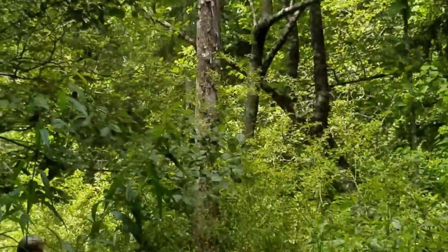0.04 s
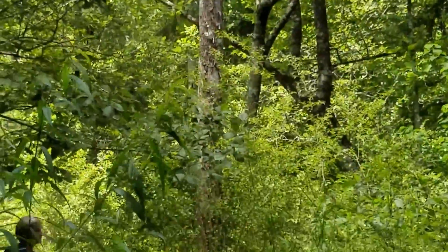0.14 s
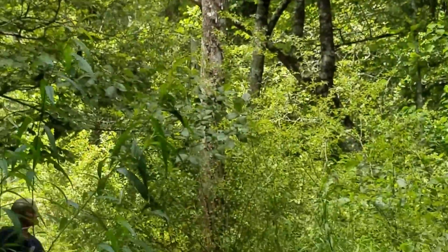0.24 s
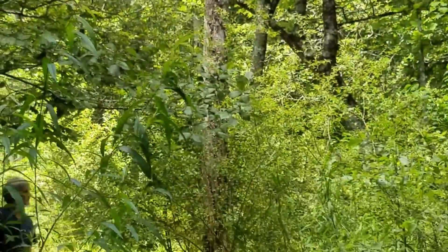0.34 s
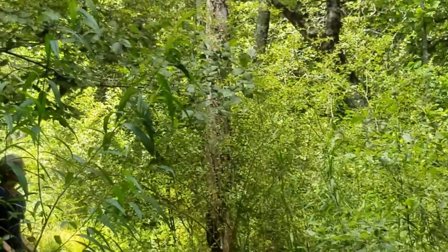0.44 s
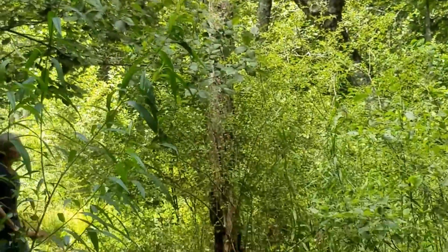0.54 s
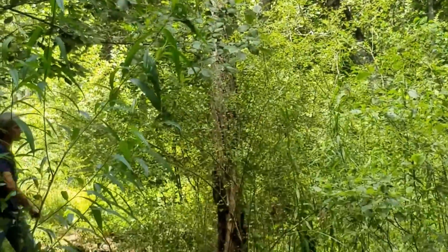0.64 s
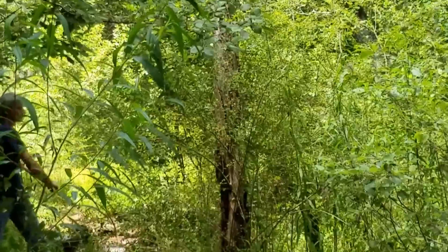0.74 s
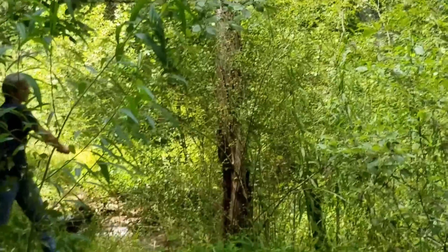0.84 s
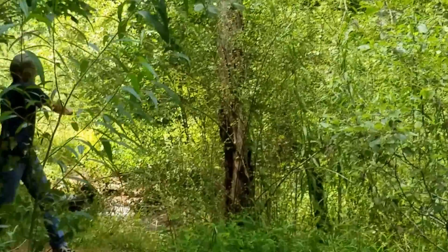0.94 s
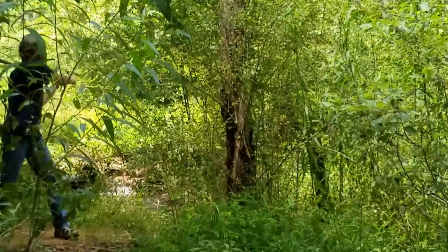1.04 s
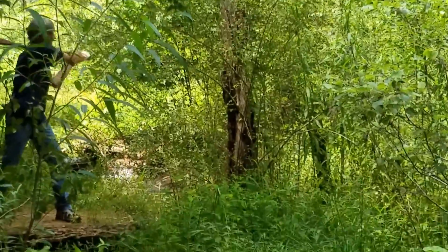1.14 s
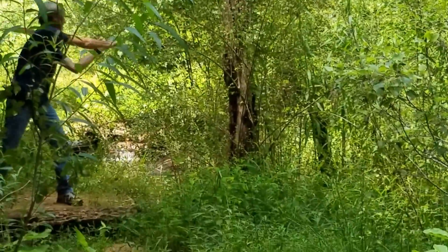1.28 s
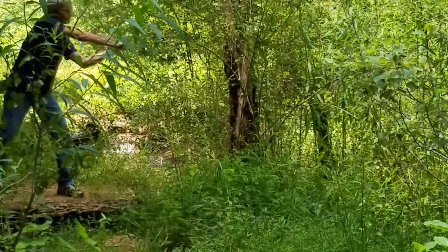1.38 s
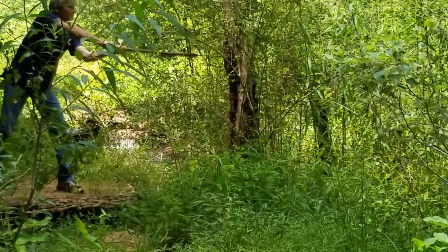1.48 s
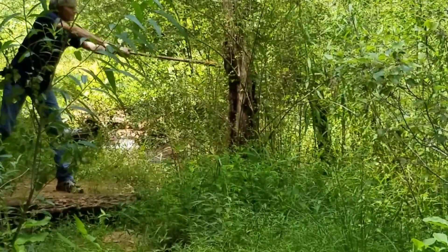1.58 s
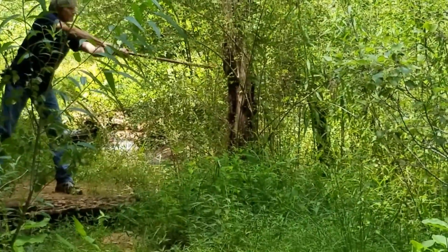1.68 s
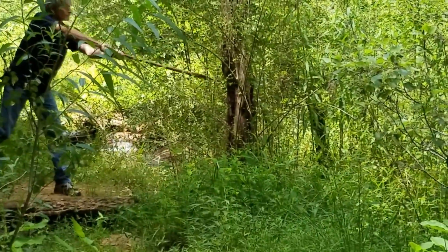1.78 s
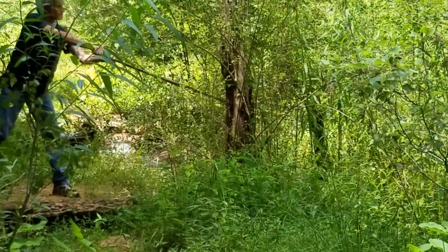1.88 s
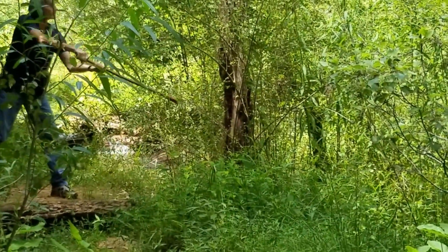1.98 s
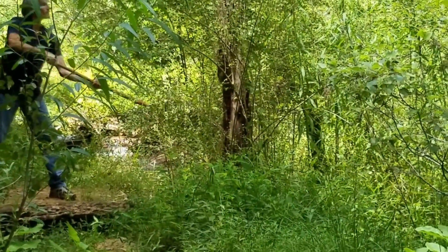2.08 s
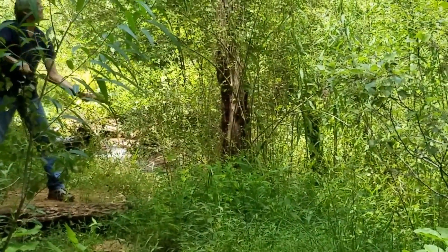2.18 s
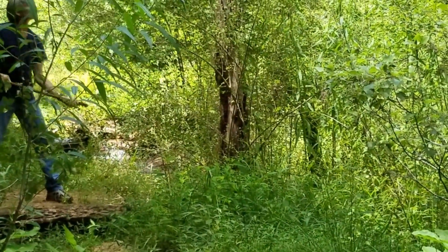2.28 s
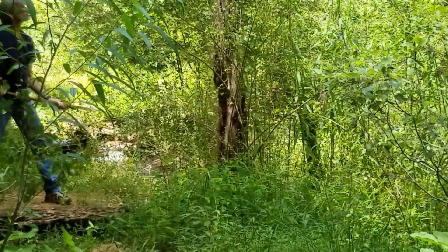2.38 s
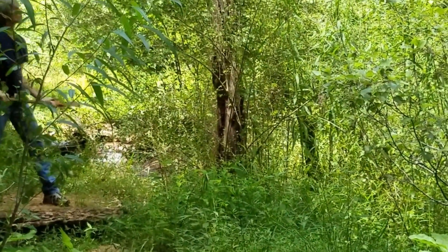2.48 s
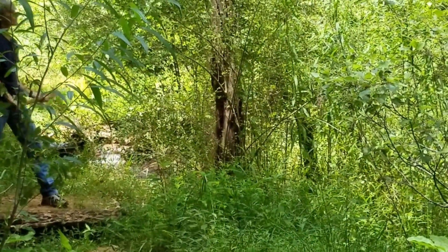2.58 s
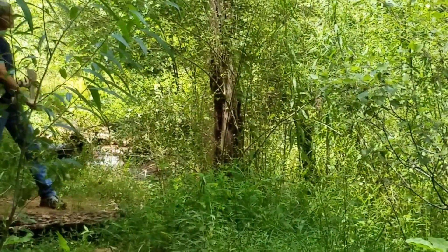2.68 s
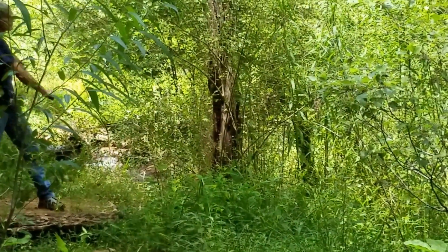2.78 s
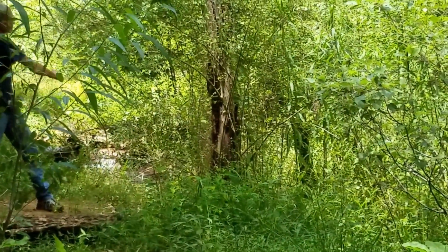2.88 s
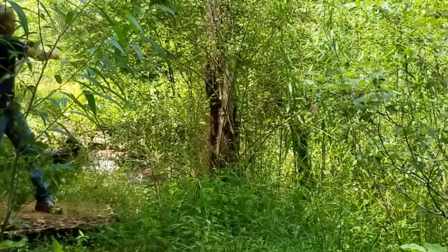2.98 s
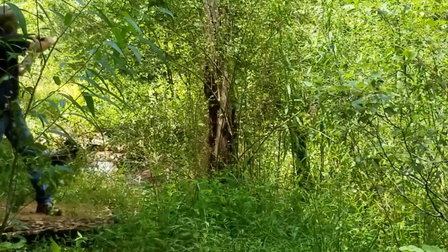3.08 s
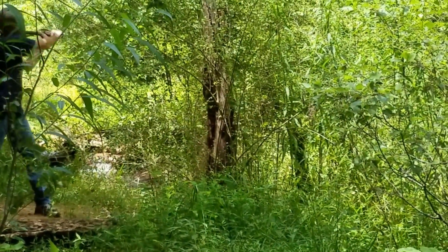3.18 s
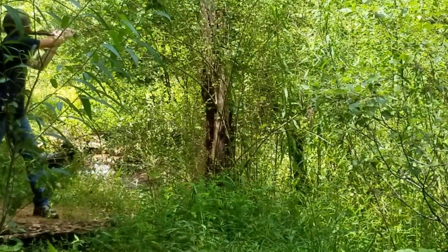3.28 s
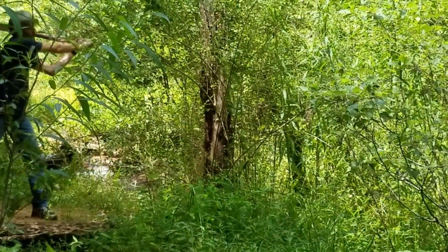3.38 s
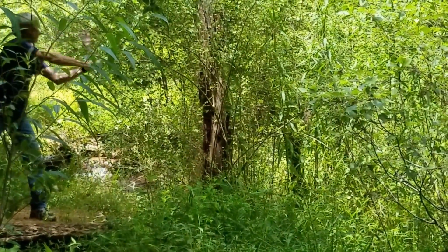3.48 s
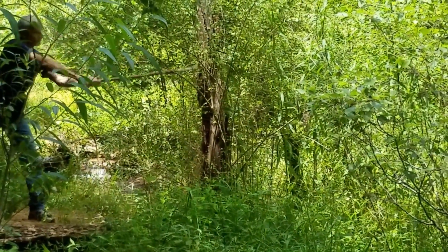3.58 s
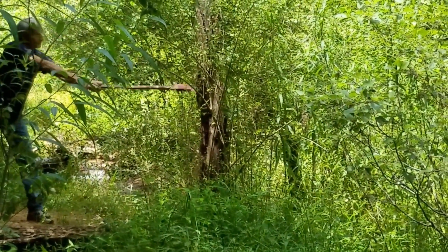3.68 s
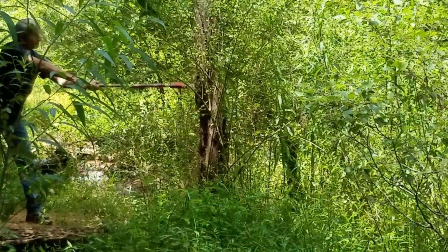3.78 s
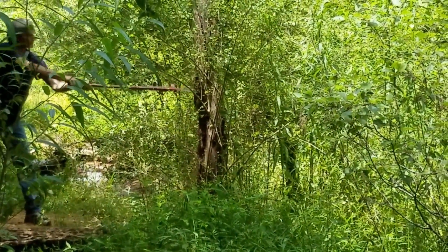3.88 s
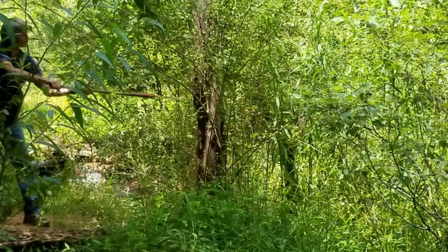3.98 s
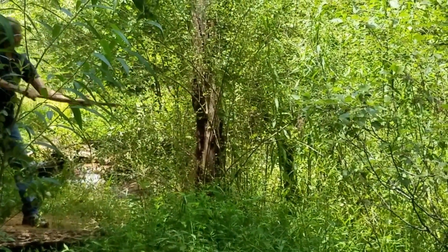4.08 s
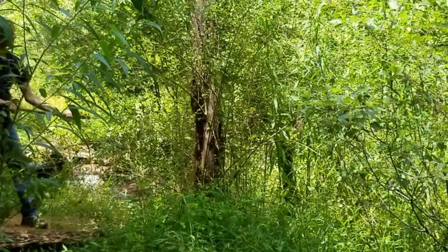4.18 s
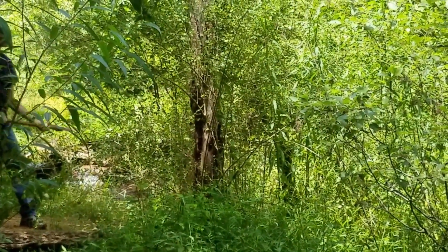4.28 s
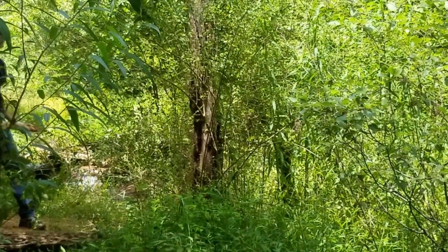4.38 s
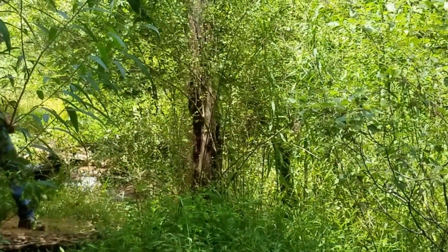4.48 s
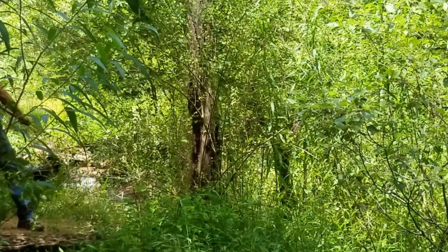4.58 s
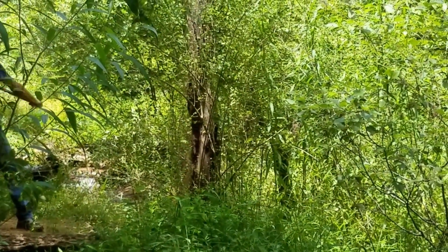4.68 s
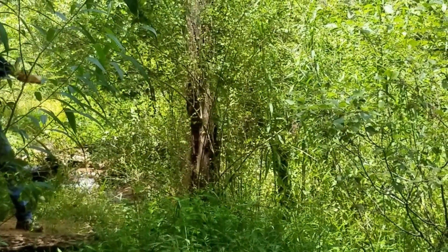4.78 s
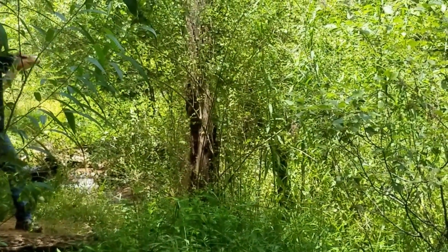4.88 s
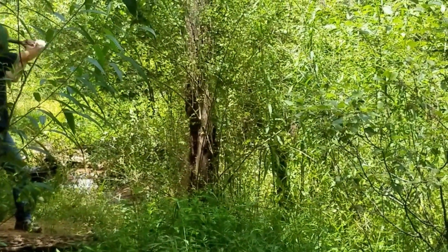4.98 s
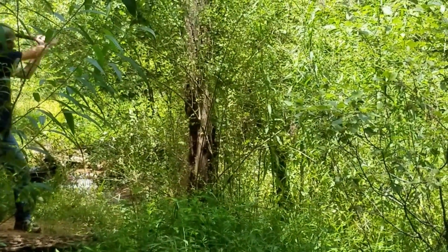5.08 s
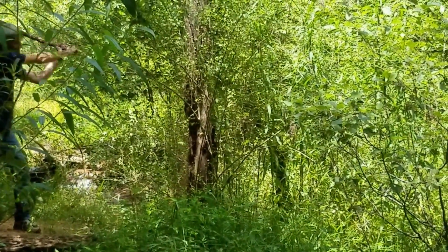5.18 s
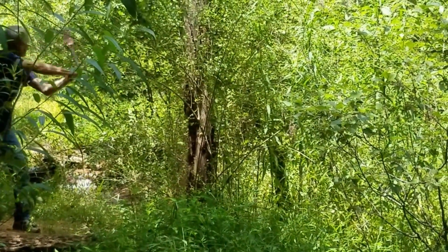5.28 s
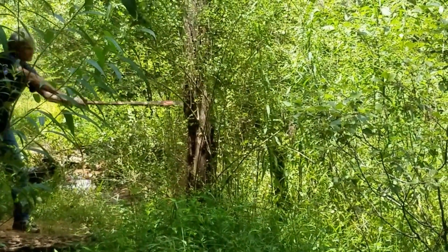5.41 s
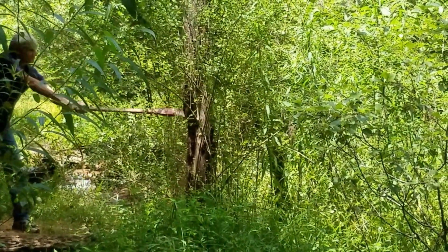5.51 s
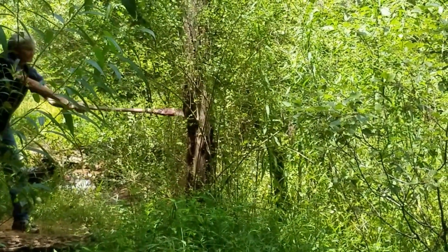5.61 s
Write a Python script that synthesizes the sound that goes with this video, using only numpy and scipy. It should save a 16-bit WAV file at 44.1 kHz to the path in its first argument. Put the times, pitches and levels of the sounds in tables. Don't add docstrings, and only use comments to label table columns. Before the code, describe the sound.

Quiet creek hiss with tiny drips and leaf rustle leads to three spaced axe chops into dead wood. The first is very loud, short and slightly saturated; the second softer and longer, the third in between. Each splits fibres and a chip, knocks hollowly and echoes among trees. Faint insects and a barely audible distant motor arrive late. Outdoors, wide stereo, a few metres from the tree.

```python
import sys
import numpy as np
from scipy import signal
from scipy.fft import rfft, irfft, next_fast_len
from scipy.io import wavfile
from scipy.ndimage import uniform_filter1d, map_coordinates

SR = 44100
rng = np.random.default_rng(int(sys.argv[2]) if len(sys.argv) > 2 else 0)


def dump_mix(stems):
    frames = np.atleast_2d(stems).T
    limited = np.clip(frames, -1, 1)
    pcm = np.round(limited * 32767).astype(np.int16)
    wavfile.write(sys.argv[1], SR, pcm)


def volts_from_db(level):
    exponent = np.asarray(level, float) / 20
    return 10 ** exponent


N = 248979
TIME = np.arange(N) / SR

# (time [s], thump level [dB], thump t60 [s], crack level [dB], forest level [dB])
BLOWS = [
    (1.6357, 3, 0.049, -12, -29),
    (3.7368, -3.5, 0.094, -17, -33),
    (5.5402, -1.5, 0.074, -16.5, -33.5),
]
# (settling pitch [Hz], extra early cycles [1], settling time [s])
BENDING_WAVES = [(142, 1.45, .0047), (163, 1.02, .004), (160, 1.06, .0036)]
# (frequency [Hz], level [dB per Hz])
CRACK_SPECTRA = [
    [(380, -25), (650, -0.5), (1640, -14), (4730, -9.5), (5400, -22), (6260, -16.5), (6880, -35),
     (7450, -26), (7970, -50), (8750, -24.5), (10700, -21), (13600, -34), (16000, -24)],
    [(380, -17), (650, -4.5), (3120, -2.5), (3660, -15), (4660, -2), (6880, -44), (8190, -71), (9110, -31),
     (11000, -16), (12400, -33), (13300, -50), (15000, -28), (16000, -59)],
    [(380, -27), (650, -4), (1500, -4.5), (1980, -21), (2550, -6), (4080, -20), (6430, -10), (8410, -33),
     (8990, -13), (10100, -12.5), (13600, -26), (15200, -31), (16000, -38)],
]
# (delay [s], level [dB])
CHIP_SPLITS = [(0.0142, -21), (0.0105, -24), (0.0123, -17)]
# (frequency [Hz], level [dB per Hz])
CHIP_SPECTRA = [
    [(590, -36), (1000, 3), (1220, -22), (1880, 16), (3510, -12), (4590, 2), (6850, -23), (12500, -11),
     (15600, -29), (16500, -38)],
    [(590, -33), (1000, 1), (2530, -1), (4040, -22), (6310, -1), (7880, -26), (8550, -24), (12600, -16),
     (14200, -14), (16500, -35)],
    [(590, -29), (1000, 3), (1950, -18), (2840, -5), (4130, -21), (4870, 1.5), (5540, -21), (10900, -24),
     (15700, -29), (16500, -42)],
]


def axe():
    out = np.zeros((2, N + SR))
    t = np.arange(SR) / SR
    for k, (s, thump_db, t60, crack_db, forest_db) in enumerate(BLOWS):
        tearing = 0.42 * volts_from_db(-60 * t / 0.2) * (t > .002)
        bite = burst(t, rise=0.0017) + tearing
        crack = unit(diffuse(rng.standard_normal((2, SR)), CRACK_SPECTRA[k], direct=.6, top_hz=16100))
        delay, split_db = CHIP_SPLITS[k]
        chip = unit(diffuse(rng.standard_normal((2, SR)), CHIP_SPECTRA[k], top_hz=17000))
        blow = volts_from_db(crack_db) * bite * crack
        blow += volts_from_db(split_db) * burst(t - delay, rise=0.0019) * chip
        blow += thump(t, thump_db, t60, *BENDING_WAVES[k])
        blow += forest(t, forest_db, FOREST_SPECTRA[k], scatter_db=6.5)
        start = round(s * SR)
        out[:, start:start + SR] += blow
    return out[:, :N] + returns()


def burst(t, rise):
    u = np.maximum(t, 0) / rise
    return u ** 2 * np.exp(2 - 2 * u)


def thump(t, db, t60, hz, extra, settle):
    cycles = hz * t + extra * (1 - np.exp(-t / settle))
    swell = 1 - 0.88 * np.exp(-(t / 0.0066) ** 2)
    leaves = np.exp(-(t / 0.022) ** 4)
    wave = volts_from_db(-60 * t / t60) * swell * leaves * np.sin(2 * np.pi * cycles)
    sway = volts_from_db(-24.0) * burst(t, rise=0.0062) * np.sin(2 * np.pi * 112 * (t - .0065))
    return volts_from_db(db) * (wave + sway)


# (delay [s], peak level [dB], frequency [Hz])
END_RETURNS = [(.028, -24, 744), (.036, -22, 720), (.043, -19, 510), (.054, -20, 389), (.056, -21, 250),
               (.074, -24.5, 147.2), (0.077, -32, 273)]
# (travel time over the usual [1], level [dB])
TRAVEL = [(.87, 1), (1.01, -7), (.99, -13)]
# (time [s], peak level [dB], frequency [Hz])
KNOCKS = [(1.753, -38, 142), (1.842, -39.5, 258), (1.862, -43.5, 177), (3.742, -21, 1240),
          (3.746, -23, 815), (3.767, -23.5, 553), (3.961, -40, 196), (5.543, -22.5, 1460),
          (5.544, -17.5, 930), (5.558, -21, 760), (5.57, -31.5, 950), (5.592, -22, 382), (5.599, -22, 365)]


def returns():
    back = []
    for blow, (travel, loss_db) in zip(BLOWS, TRAVEL):
        for delay, db, hz in END_RETURNS:
            back.append((blow[0] + delay * travel, db + loss_db, hz / np.sqrt(travel)))
    return packets(trains(back + KNOCKS, cycles=2.03), glide=-0.044, stray=0.1)


# (frequency [Hz], level [dB per Hz])
FOREST_SPECTRA = [
    [(29, -49), (50, -30), (135, 0), (234, -8), (291, 1), (472, -13.5), (765, -14), (905, -22), (1180, -20),
     (4450, -15.5), (7390, -32.5), (11700, -27.5), (16000, -47)],
    [(29, -45.5), (50, -19), (145, -1), (234, -6), (271, -7.5), (472, -19), (2010, -16), (2620, -14),
     (3580, -21), (4350, -16.5), (7950, -35.5), (10100, -30), (16000, -47)],
    [(29, -59), (50, -28), (145, 1), (258, -7.5), (380, -11), (520, -18.5), (927, -17), (1620, -27),
     (2950, -19.5), (3180, -20.5), (7570, -33.5), (11100, -33), (16000, -51)],
]
# (frequency [Hz], t60 [s])
FOREST_DECAY = [(60, 0.27), (110, 0.93), (200, 0.99), (350, 0.39), (700, 0.78), (1500, 0.85), (2700, 0.83),
                (5000, 0.66), (12000, 0.49)]
# (frequency [Hz], wait [s])
BASS_GAP = [(350, .024), (900, .004)]


def forest(t, db, colour, scatter_db):
    f, frames, z = signal.stft(rng.standard_normal((2, SR)), SR, nperseg=256)
    lumps = unit(smoothed_noise(z.shape[1:], bins=20, frames=2))
    lumps_db = scatter_db * lumps * np.exp(-frames / 0.038)
    decay_db = 60 * (frames - .1) / along(FOREST_DECAY, f)[:, None]
    z = z * volts_from_db(lumps_db - decay_db)
    z = z * (1 - np.exp(-(frames / along(BASS_GAP, f)[:, None]) ** 4))
    level = np.sqrt(np.mean(volts_from_db(along(colour, np.arange(SR // 2))) ** 2))
    echo = diffuse(signal.istft(z, SR, nperseg=256)[1][:, :SR], colour) / level
    return volts_from_db(db) * (1 - np.exp(-(t / 0.02) ** 2)) * echo


# (frequency [Hz], level [dB per Hz])
HISS = [(120, -14.5), (200, -8), (296, -8), (359, -10.5), (399, -6.5), (443, -13), (538, -6), (765, -3),
        (827, -5), (1320, -5), (1590, -3), (1900, -4.5), (2570, -4.5), (3700, -9), (4500, -8), (5600, -13),
        (9900, -120)]
# (frequency [Hz], level [dB per Hz])
FIZZ = [(2650, -60), (4500, -5), (4620, 8.5), (5020, -5.5), (5840, -14), (6320, -5), (6910, -8.5),
        (7590, -14), (9160, -4), (11100, -3.5), (13500, -11.5), (15100, -17), (15700, -9)]
# (frequency [Hz], level [dB per Hz])
RUMBLE = [(12, -44), (20, -25), (27, -70), (43, -7), (134, -2), (157, -1), (188, -4.5), (350, -10),
          (460, -35), (770, -120)]
# (time [s], level [dB])
FLOW = [(0, -0.5), (1.1, 0.5), (2.6, 0), (3.1, 0), (3.6, 0), (5.2, .5), (5.65, 0)]


def creek():
    blow_times = [-0.33] + [blow[0] for blow in BLOWS]
    linger = sum(burst(TIME - s, rise=0.37) for s in blow_times)
    flow_db, = curves(FLOW)

    def band(steady_db, echo_db):
        return np.hypot(volts_from_db(steady_db + flow_db), volts_from_db(echo_db) * linger)

    hiss, fizz, rumble = band(-51.5, -54.5), band(-51.6, -54.5), band(-62, -61.5)
    rumble = np.hypot(rumble, volts_from_db(-53) * np.exp(-TIME / 0.085))
    water = hiss * volts_from_db(0.15 * wobble(6.5)) * rush(HISS, patchy_db=2.5)
    water += fizz * volts_from_db(-9.0 + 0.3 * wobble(16)) * rush(FIZZ, patchy_db=1.5)
    water += rumble * volts_from_db(0.3 * wobble(5.6)) * rush(RUMBLE, patchy_db=-1.5)
    return water + gurgles()


# (time [s], peak level [dB], frequency [Hz])
DRIPS = [(.068, -30, 2090), (0.129, -37.5, 430), (.242, -45, 1630), (.378, -38.5, 2400), (.413, -39, 1048),
         (.47, -45, 2080), (0.943, -46, 2780), (1.045, -41, 2560), (1.067, -38, 3100), (1.078, -45, 1840),
         (1.363, -36, 2590), (1.393, -42, 1540), (2.295, -39, 1480), (2.407, -47, 1660), (2.43, -47, 2170),
         (2.556, -44, 1040), (2.767, -43, 1730), (3.181, -42, 1710), (3.259, -42.5, 1520),
         (3.523, -45, 2550), (3.603, -41, 2530), (4.445, -39, 1080), (4.468, -44, 2270), (4.992, -44, 2600),
         (5.203, -47, 2600), (5.285, -47, 2740), (5.405, -48, 2560)]


def gurgles():
    cycles, middle_hz = 4, 2000
    drips = []
    for s, db, hz in DRIPS:
        drips.append((s, db, hz, 1000 * cycles / (hz * middle_hz ** 2) ** (1 / 3)))
    rings = packets(drips, glide=0.013, stray=0.36)
    return rings / (1 + np.abs(rings) / .012)


# (time [s], resonance [Hz], pressure [dB])
SCRAPE = [(0, 1315, -47), (.125, 1320, -50.5), (.15, 1585, -47), (.25, 1657, -52), (.35, 1666, -59.5),
          (.45, 1680, -60), (.55, 1664, -68)]
# (time [s], level [dB], length [s])
LEAVES = [(0.95, -47, 0.0018), (1.08, -50, 0.06), (1.302, -53, 0.0016), (2.44, -49, 0.016),
          (3.04, -52.5, 0.011), (4.31, -68, 0.0074), (4.924, -49.5, 0.042)]
# (time [s], peak level [dB], frequency [Hz])
TWIGS = [(.003, -39, 9500), (.075, -36, 7300), (.213, -47, 10000), (.385, -47, 9000), (.953, -41, 800),
         (1.2995, -35, 1900), (1.461, -48, 5800), (2.113, -46, 10500), (2.425, -45, 5800),
         (2.437, -43, 10500), (3.052, -46, 12500)]


def brush():
    pressure_db = curves(SCRAPE)[1]
    rustle_db = -48 + 0.64 * (pressure_db - SCRAPE[0][2])
    rustle = volts_from_db(rustle_db) * rush([(100, -34), (250, -0.5), (900, 3), (2200, -2), (6000, -34)], patchy_db=2.0)
    puffs = sum(volts_from_db(db) * np.exp(-((TIME - s) / length) ** 2) for s, db, length in LEAVES)
    leaves = rush([(600, -20), (1500, 0.5), (2600, 1.5), (5000, -10.5), (5800, -15), (7500, -25),
                   (11000, -12.5), (15000, -26)], patchy_db=2.0)
    snaps = packets(trains(TWIGS, cycles=0.82), glide=0, stray=0.024)
    return song(SCRAPE, blur_hz=330) + rustle + puffs * leaves + snaps


# (start [s], length [s], first pitch [Hz], last pitch [Hz], level [dB])
HIGH_NOTES = [(3.17, 0.25, 8600, 8300, -66), (3.42, 0.31, 8140, 8250, -68)]
LOW_NOTE = [(4.66, .58, 4650, 4430, -60.5)]
CHORUS_NOTE = [(4.7, 0.825, 3614, 3590, -56)]


def insects():
    singers = notes(HIGH_NOTES, blur_hz=111) + notes(LOW_NOTE, blur_hz=170.5)
    return singers + notes(CHORUS_NOTE, blur_hz=900, attack=0.57, release=0.57)


def notes(rows, blur_hz, attack=0.056, release=0.28):
    out = 0
    share = np.array([0, attack, 1 - release, 1])
    for s, length, first_hz, last_hz, db in rows:
        hz = first_hz + (last_hz - first_hz) * share
        level_db = db - 10 * np.array([1, 0, 0, 1])
        out = out + song(np.c_[s + length * share, hz, level_db], blur_hz)
    return out


# (time [s], frequency [Hz], level [dB])
MOTOR = [(4.85, 135, -80), (4.95, 134, -63), (5.45, 137, -60), (5.65, 136, -58)]


def motor():
    return song(MOTOR, blur_hz=42.0)[0]


def song(rows, blur_hz):
    hz, db = curves(rows)[:2]
    on = (TIME > rows[0][0]) & (TIME < rows[-1][0])
    carrier = np.exp(2j * np.pi * np.cumsum(hz) / SR)
    blur = np.array([wobble(blur_hz) + 1j * wobble(blur_hz) for _ in range(2)])
    return on * volts_from_db(db) * unit(np.real(carrier * blur))


def trains(rows, cycles):
    return [(s, db, hz, 1000 * cycles / hz) for s, db, hz in rows]


def packets(rows, glide, stray):
    out = np.zeros((2, N))
    for (s, db, hz, ms), (phase, apart) in zip(rows, rng.standard_normal((len(rows), 2))):
        near = slice(max(round((s - .004 * ms) * SR), 0), round((s + .004 * ms) * SR))
        u = (TIME[near] - s) / (ms / 1000)
        turn = 2 * np.pi * (hz * ms / 1000 * (u + glide * u ** 2 / 2) + phase)
        split = stray * apart * hz / 1000 * np.array([[1], [-1]])
        out[:, near] += volts_from_db(db) * np.exp(-u ** 2 / 2) * np.sin(turn + split)
    return out


def rush(spectrum, patchy_db):
    z = signal.stft(rng.standard_normal((2, N)), nperseg=256)[2]
    patches = unit(smoothed_noise(z.shape[1:], bins=3, frames=4))
    noise = signal.istft(z * volts_from_db(patchy_db * patches), nperseg=256)[1][:, :N]
    return unit(diffuse(noise, spectrum))


# (frequency [Hz], coherence [1])
ALIKE = [(60, 0.96), (130, 0.97), (290, 0.87), (450, 0.52), (650, 0.6), (900, 0.018), (1300, 0.023)]
# (frequency [Hz], coherence at the lag [1])
LATE = [(800, 0), (1150, .4), (1350, .3), (1600, .67), (2150, .08), (2600, .6), (3200, .08), (3500, .08),
        (4050, .6), (4400, .25), (4750, .56), (5500, .1), (8000, .25), (11000, .1)]


def diffuse(pair, spectrum, direct=0, top_hz=15800):
    lag = 52 / SR

    def parts(hz):
        colour = volts_from_db(along(spectrum, hz)) * (hz < top_hz)
        near = np.maximum(along(ALIKE, hz), direct * (hz < 1600))
        share = near + (1 - near) * along(LATE, hz) * np.exp(-2j * np.pi * hz * lag)
        rest = np.sqrt(np.abs(1 - np.abs(share) ** 2))
        return colour * [share, rest, np.ones(len(hz))]

    common, own, right = filtered(pair[[0, 1, 0]], parts)
    return np.array([common + own, right])


def smoothed_noise(shape, bins, frames):
    field = uniform_filter1d(rng.standard_normal(shape), size=bins, axis=0)
    return uniform_filter1d(field, size=frames, axis=1)


def filtered(x, response):
    m = next_fast_len(x.shape[-1] + 8192)
    return irfft(rfft(x, m) * response(np.fft.rfftfreq(m, 1 / SR)), m)[..., :x.shape[-1]]


def unit(x):
    return x / np.sqrt(np.mean(x ** 2) + 1e-20)


def along(points, hz):
    f, v = np.transpose(points)
    return np.interp(np.log(hz + 1), np.log(f + 1), v)


def curves(rows):
    s, *cols = np.transpose(rows)
    return [np.interp(TIME, s, c) for c in cols]


def wobble(rate):
    return map_coordinates(rng.standard_normal(int(N * rate / SR) + 4), [TIME * rate])


def scene():
    return axe() + creek() + brush() + insects() + motor()


def band_limit(x):
    return signal.sosfilt(signal.butter(12, 17040, fs=SR, output="sos"), x)


# (frequency [Hz], left minus right [dB])
PORTS = [(60, -3.5), (92, -0.5), (140, -2.5), (210, -1.5), (330, 0.5), (500, -4.5), (770, -1.5),
         (1170, -0.5), (1790, -0.5), (2740, -7), (4190, -4), (6410, -0.5), (9810, -4), (15000, -5.5)]


def record(dry):
    ports = filtered(dry, lambda hz: volts_from_db(along(PORTS, hz) * np.array([[.5], [-.5]])))
    ports = ports / (1 + np.abs(ports / .8) ** 4) ** (1 / 4)
    return band_limit(ports)


dry = scene()
out = record(dry)
dump_mix(out)
```